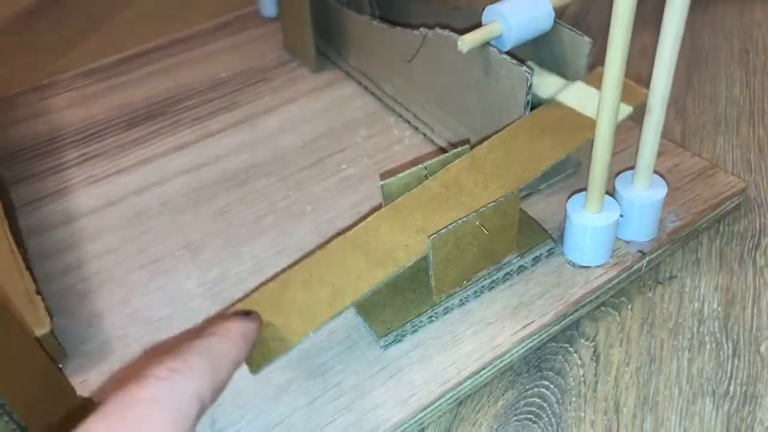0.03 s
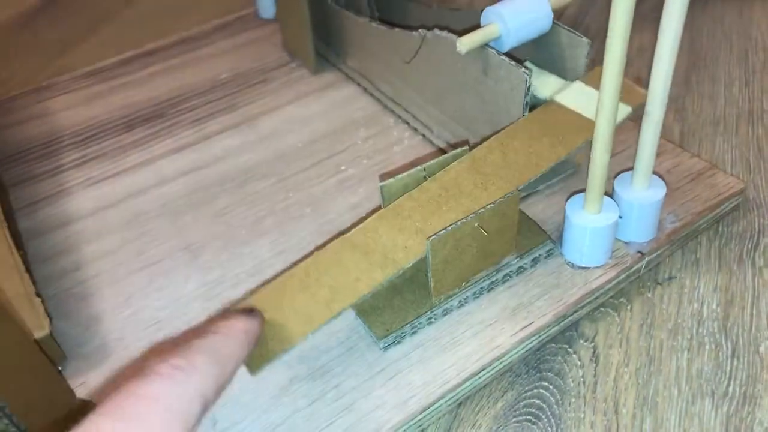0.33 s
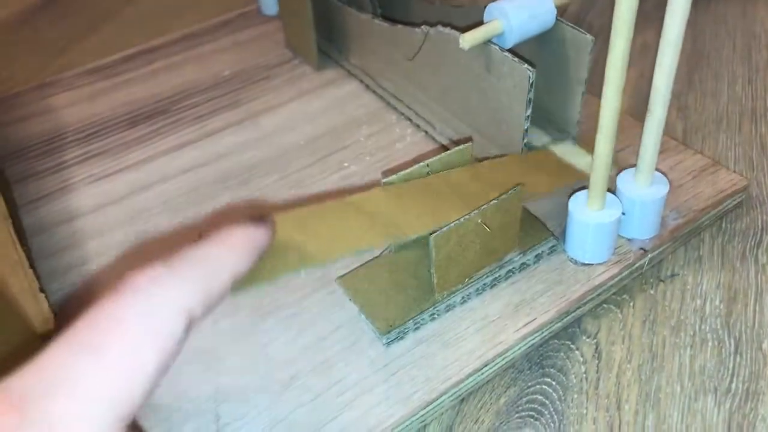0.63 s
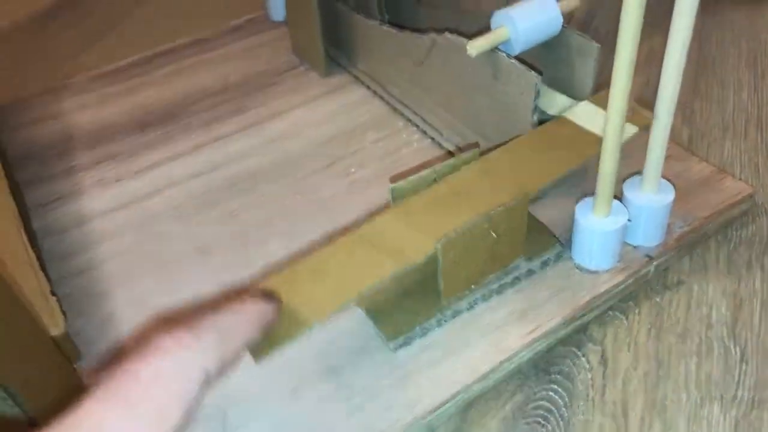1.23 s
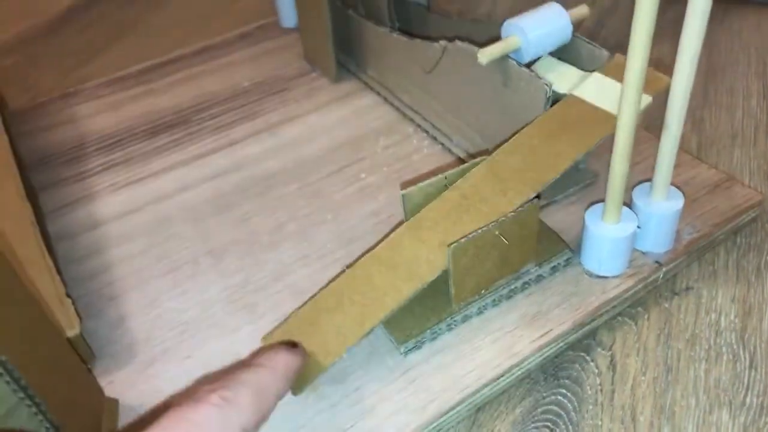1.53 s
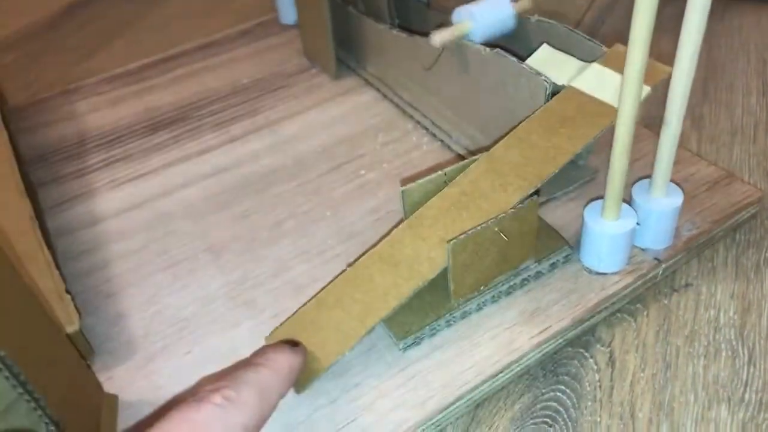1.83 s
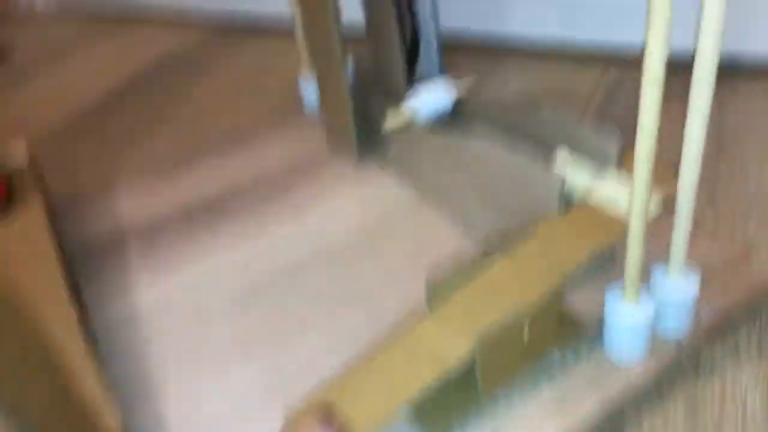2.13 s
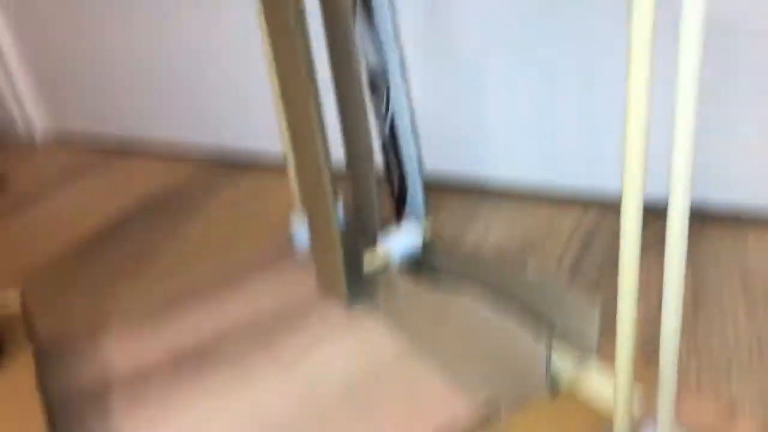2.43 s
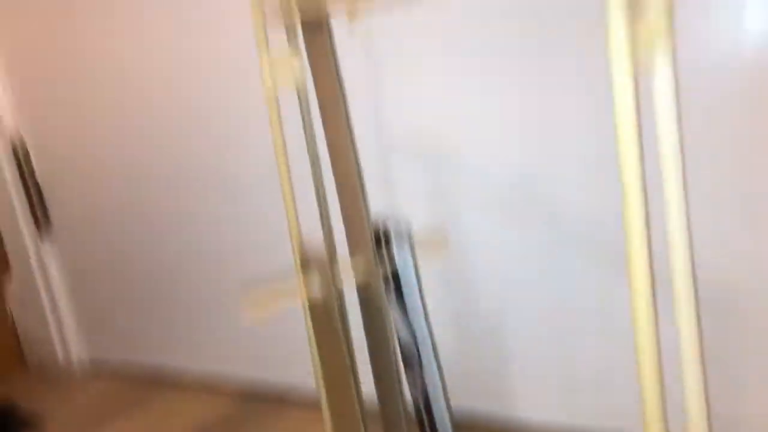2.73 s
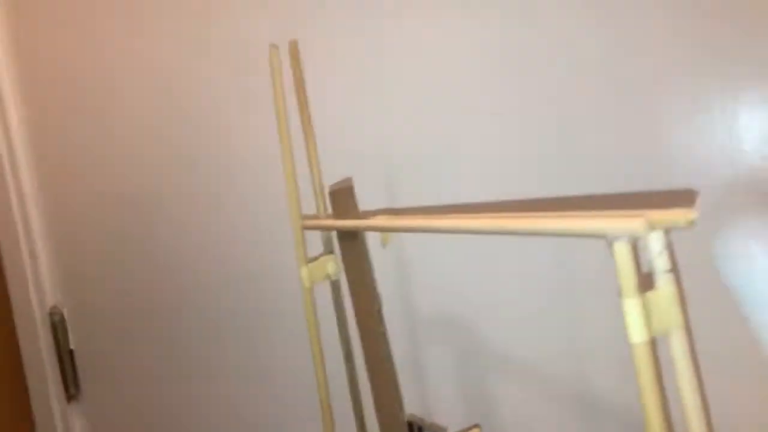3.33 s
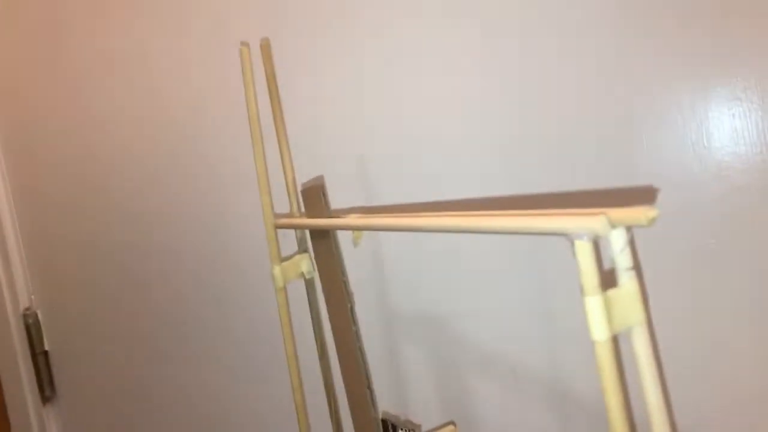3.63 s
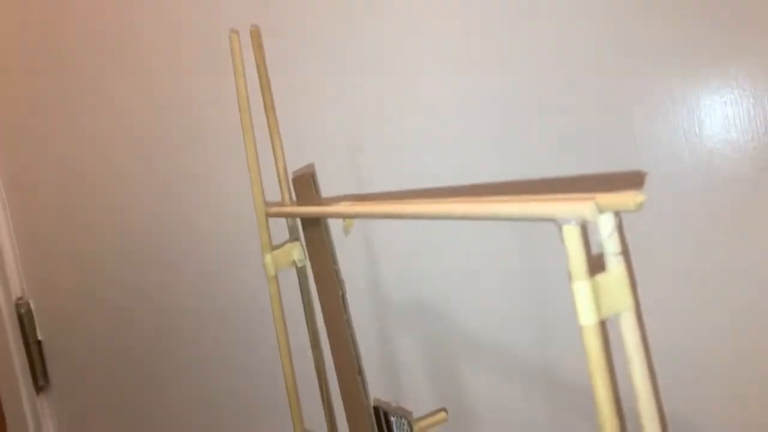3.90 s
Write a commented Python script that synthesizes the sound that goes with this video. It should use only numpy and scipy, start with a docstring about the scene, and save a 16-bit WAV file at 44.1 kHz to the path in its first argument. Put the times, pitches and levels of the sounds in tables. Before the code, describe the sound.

A light hard ball bouncing on a wooden floor is the main sound, arriving at the end. Faint cardboard ticks sound over a low room hum, with soft scrapes and swishes from about 1.5 seconds and sharper clicks near 2.1 and 2.9. The ball rumbles softly along wooden rails around 3.2, then lands with three loud, ringing cracks at 3.5, 3.7 and 3.9 seconds.

```python
"""A small, live room with a homemade wooden ball run. A cardboard lever is pressed and let go: dry ticks
ring the frame, card scrapes the base board, and lever and lift squeak and swish. A light hard ball rolls
off the top rails and bounces three times on the floor, each hit a sharp crack with ringing shell and
floorboards. The knocks drive the recorder's limiter, which ducks the low room hum."""
import sys
import numpy as np
from scipy import signal
from scipy.io import wavfile
from scipy.ndimage import uniform_filter1d

SR = 44100
rng = np.random.default_rng(int(sys.argv[2]) if len(sys.argv) > 2 else 0)


def dump_mix(stems):
    """Bounce the given channels to the path in sys.argv[1] as a 16-bit WAV at rate SR."""
    frames = np.atleast_2d(stems).T  # one column per channel
    limited = np.clip(frames, -1, 1)  # hard clip at full scale
    pcm = np.round(limited * 32767).astype(np.int16)
    wavfile.write(sys.argv[1], SR, pcm)


N = 176400

# floor hits (t/s, level/dB, crack/dB, room/dB, ring/dB, bass/dB,
# floor note at that spot f/Hz, note/dB, shell f/Hz, shell/dB)
FLOOR_HITS = [(3.486, 27.5, -1.5, 3, 4, -1, 668.5, -6.5, 2680, -6.5),
              (3.749, 26, -3, -2, -2, -3, 409.5, -12, 2370, -1.5),
              (3.8922, 22.5, -2, -9.5, -13.5, 4, 184.5, -19, 2630, -8)]
# tone of the hard contact (f/Hz, level/dB)
CRACK_EQ = [(40, -35.5), (110, -7.5), (180, -7), (300, -6.5), (700, -7.5), (950, -4.5), (1300, -4),
            (2000, -1), (2700, 1.5), (3800, -5.5), (5200, -19.5), (6800, -25.5), (8500, -35.5),
            (11000, -40), (13500, -58.5), (15500, -64.5)]
# slapback off nearby surfaces (delay/s, level/dB)
SLAPBACKS = [(.0024, -2), (.0048, -6), (.007, -7), (0.0133, -12.5), (.0175, -10.5)]
# resonances of ball and floorboards (f/Hz, level/dB, t60/s)
BALL_FLOOR_MODES = [(360.4, -5, 0.21), (420.5, -6.5, 0.19), (610, -3, 0.23), (1480, -8, 0.17),
                    (1650, -3, .17), (1722, -1.5, 0.14), (1933, -0.5, 0.21), (1987, 2, .17), (2180, 1, .18),
                    (2250, -0.5, .17), (2403, -3.5, .2), (2442, 0, .22), (2618, 2.5, 0.16),
                    (2680, -3.5, .19), (2886, -13, .17), (2995, -3.5, .18), (3300, -13.5, .17)]
# tone of the room's short answer (f/Hz, level/dB)
ROOM_EQ = [(40, -40), (110, -20.5), (170, -13.5), (280, -11), (550, -9.5), (950, -11), (1700, -5.5),
           (2800, -1.5), (3900, -9.5), (5200, -20), (6600, -22), (8500, -35.5), (11000, -43),
           (13300, -55.5), (14500, -89)]
# tone of the long, lingering tail (f/Hz, level/dB)
LATE_EQ = [(100, -11), (500, -14.5), (1400, -12.5), (2200, -6), (2900, -2.5), (3900, -11.5), (5000, -22),
           (9000, -43), (15000, -51.5)]


def bounce(db, crack_db, room_db, ring_db, bass_db, note_hz, note_db, shell_hz, shell_db):
    """The ball hits the floor: a hard crack sets shell and boards ringing, and the room answers."""
    t = np.arange(SR // 2) / SR
    ring_attack_s, shell_attack_s = 0.0091, 0.0066
    click = colour(1. * (t == 0), CRACK_EQ, bass_db)
    transient = click.copy()
    for delay, slap_db in SLAPBACKS:
        add(transient, delay, amp(slap_db) * click)
    crack = amp(-8) * transient + amp(crack_db) * colour(burst(t, t60=.03), CRACK_EQ, bass_db)
    ring = unit(ringing(t, BALL_FLOOR_MODES) * np.minimum(t / ring_attack_s, 1))
    shell = unit(mode(t, shell_hz, t60=0.021) * np.minimum(t / shell_attack_s, 1) ** 2)
    notes = amp(note_db) * mode(t, note_hz, t60=.17) + amp(shell_db) * shell
    room = amp(room_db) * colour(room_tail(t), ROOM_EQ, bass_db)
    late = amp(-21.5) * colour(burst(t, t60=1.5), LATE_EQ)
    return amp(db) * (crack + amp(ring_db - 3.5) * ring + notes + room + late)


# ticks of card and wood (t/s, level/dB, bass/dB, treble/dB, t60/s, frame ring/dB)
TICK_CUES = [(.0488, -23.5, 11, 5.5, 0.0014, -31), (.193, -31, -13, 3, 0.007, -9),
             (.852, -32, 8, -9, .01, -20), (0.8927, -25, 9.5, -9, 0.017, -16),
             (1.183, -33, 1, -12, 0.013, -22), (1.4593, -30, 4, -15, 0.0086, -16),
             (1.627, -30.5, 9, -6, .014, -20), (1.806, -31, 5, -5, 0.035, -18),
             (1.8919, -24.5, 15, -3, .02, -20), (1.927, -22, 13, -14, 0.013, -27),
             (1.97, -26, 1, -2, .015, -10), (2.0379, -16.5, 5, -23, 0.016, -20),
             (2.087, -23, 1, 3, 0.018, 3), (2.138, -10, -8, -2, 0.00094, -22),
             (2.2173, -16.5, -12, 5, 0.03, 4), (2.411, -34, 11, 0, .02, -20),
             (2.7694, -28.5, -14, -6, 0.009, 0), (2.8966, -23, -9, 8, .004, -19),
             (2.9459, -10.5, 10, 1.5, 0.0013, -33), (3.060, -29, -22, -8, 0.018, -5),
             (3.097, -30.5, -3, 3, 0.0074, -20)]
# tone of a tick (f/Hz, level/dB)
TICK_EQ = [(60, -2.5), (300, 16), (900, 9.5), (2000, 7), (3300, 4), (5000, -6), (8000, -22), (15000, -43)]
# resonances of the wooden frame (f/Hz, level/dB, t60/s)
FRAME_MODES = [(1770, -1, .035), (1900, -1, 0.027), (2330, -5, 0.032), (2575, 1, 0.027), (2730, -6, .04),
               (3980, -8, .025)]


def ticks():
    """Card and wood snap with a short crackle and ring the frame, with a touch of room."""
    t, out = np.arange(SR // 2) / SR, np.zeros(N)
    spike = 6.3 * (t == 0)
    for s, db, bass_db, treble_db, t60, ring_db in TICK_CUES:
        crackle = scatter(t) * fade(t, t60)
        snap = colour(unit(spike + crackle), TICK_EQ, bass_db, treble_db)
        add(out, s, amp(db) * (snap + amp(ring_db) * ringing(t, FRAME_MODES)))
    return out + amp(-13.5) * signal.fftconvolve(out, room_tail(t))[:N]


# soft bumps (t/s, f/Hz, level/dB, attack/s, t60/s)
BUMP_CUES = [(2.1382, 303, -16.5, 0.00063, 0.01), (2.9468, 298, -17, 0.00025, 0.02),
             (2.952, 48.6, -11, 0.0049, 0.11), (3.203, 265, -37, 0.0029, 0.15),
             (2.215, 38.4, -34.5, 0.012, 0.76), (1.965, 36, -32, .005, 0.19), (1.5, 57, -34, 0.003, 0.11)]


def bumps():
    """Dull thumps through hand and frame, each a low, damped sine."""
    t, out = np.arange(SR // 2) / SR, np.zeros(N)
    for s, hz, db, attack, t60 in BUMP_CUES:
        envelope = np.minimum(t / attack, 1) * fade(t, t60)
        add(out, s, amp(db) * envelope * np.sin(2 * np.pi * hz * t))
    return out


# fader curve of the rubbing card (t/s, level/dB)
RUB_FADER = [(1.1, -92), (1.45, -70.5), (1.785, -65.5), (1.81, -50.5), (1.87, -63.5), (1.94, -46.5),
             (2.02, -49.5), (2.11, -46), (2.17, -49), (2.21, -54), (2.28, -56.5), (2.36, -87)]
# tone of the scrape (f/Hz, level/dB)
RUB_EQ = [(60, -7), (200, 0.5), (400, -1), (650, -2.5), (1000, -7.5), (1500, -17), (2700, -19), (4500, -41),
          (7000, -26), (9000, -40), (15000, -44)]
# hollow resonances of the base board (f/Hz, level/dB, t60/s)
BOARD_MODES = [(299, -9.5, .1), (403, -1, 0.11), (549, -12.5, 0.064), (645, -7.5, 0.067), (977, -14, .04),
               (1740, -16, .05), (2694, -13, .04)]


def rubbing():
    """Cardboard scrapes over the base board and sets it ringing."""
    scrape = friction(RUB_FADER, RUB_EQ, grains_per_s=1600, spread_db=4.0)
    flat_eq = [(100, 0), (10000, 0)]
    drive = friction(RUB_FADER, flat_eq, grains_per_s=1800, spread_db=3)
    board = ringing(np.arange(SR // 4) / SR, BOARD_MODES)
    return amp(-1.0) * scrape + amp(-2.5) * signal.fftconvolve(drive, board)[:N]


# fader curve of the roll (t/s, level/dB)
ROLL_FADER = [(2.95, -75), (3.08, -58.5), (3.16, -52.5), (3.22, -48), (3.27, -55), (3.33, -75), (3.45, -76)]
# tone of the ball on the rails (f/Hz, level/dB)
ROLL_EQ = [(80, -13.5), (180, 2.5), (270, 7.5), (400, 0), (600, -6), (900, -25.5), (2000, -19.5),
           (6000, -48.5)]


def rolling():
    """The ball runs along the rails with a low, even-grained rumble."""
    return friction(ROLL_FADER, ROLL_EQ, grains_per_s=1900, spread_db=0.3)


# fader curve of the swishes (t/s, level/dB)
SLIDE_FADER = [(1.5, -73.5), (1.58, -57), (1.64, -76), (1.9, -67.5), (1.99, -55), (2.04, -70), (2.1, -54.5),
               (2.2, -77), (2.235, -50), (2.31, -65), (2.43, -68.5), (2.5, -56), (2.66, -53), (2.85, -57.5),
               (3.0, -61), (3.2, -68.5), (3.4, -74)]
# tone of the swishes (f/Hz, level/dB)
SLIDE_EQ = [(200, -4), (800, -11), (1300, -6), (2000, 0.5), (3200, -2.5), (4800, -9.5), (6000, -12),
            (8000, -24), (12000, -33), (15500, -44)]


def sliding():
    """Lever and lift slide: dense, fine slips blur into light swishes."""
    return friction(SLIDE_FADER, SLIDE_EQ, grains_per_s=16000, spread_db=1.0)


# lever squeaks (t/s, length/s, f/Hz, glide/Hz, level/dB)
SQUEAK_CUES = [(.52, 0.19, 990, 5, -75), (.70, 0.19, 1467, -17, -71.5), (.92, .12, 1437, 79, -70.5),
               (1.179, 0.263, 1900, -51, -72.5), (1.39, 0.15, 450, 3, -63.5)]


def squeaks(waver_depth=0.018):
    """The bending lever gives faint, wavering tones that swell and fade."""
    out = np.zeros(N)
    for s, length, hz, glide_hz, db in SQUEAK_CUES:
        progress = np.linspace(0, 1, round(length * SR))
        waver = np.sqrt(N) * unit(uniform_filter1d(rng.standard_normal(N), size=200))[:len(progress)]
        pitch = (hz + glide_hz * progress) * (1 + waver_depth * waver)
        swell = np.sin(np.pi * progress)
        add(out, s, amp(db) * swell * np.sin(2 * np.pi * np.cumsum(pitch) / SR))
    return out


# reverb time of the room (f/Hz, t60/s)
ROOM_DECAY = [(150, 0.22), (450, .22), (1100, 0.19), (2800, 0.21), (7000, 0.19), (13000, 0.17)]


def room_tail(t, predelay_s=0.0043, build_s=0.011):
    """Reflections build up, then die at each band's own speed."""
    hz, times, bands = signal.stft(scatter(t), SR, nperseg=256)
    decay = fade(times, read(ROOM_DECAY, hz)[:, None])
    tail = signal.istft(bands * decay, SR, nperseg=256)[1][:len(t)]
    return unit(tail * np.clip((t - predelay_s) / build_s, 0, 1))


# tone of the room's rumble and hiss (f/Hz, level/dB)
AIR_EQ = [(10, -15), (25, 0), (45, 3), (70, -6), (130, -22), (250, -26.5), (500, -38.5), (1000, -38),
          (3000, -42), (6000, -47.5), (9000, -51), (13000, -57), (16000, -60.5)]


def room_tone(hum_hz=100.9):
    """A bed of low rumble, faint hiss and mains hum."""
    air = np.sqrt(N) * unit(colour(rng.standard_normal(N), AIR_EQ, size=16384))
    hum = np.sin(2 * np.pi * hum_hz * np.arange(N) / SR)
    return amp(-47) * air + amp(-48) * hum


def friction(fader, eq, grains_per_s, spread_db):
    """Tiny slips of uneven size excite a surface under a fader curve."""
    sizes = rng.standard_normal(N) * amp(spread_db * np.minimum(rng.exponential(1, N), 4))
    slips = sizes * (rng.random(N) < grains_per_s / SR)
    s, db = np.transpose(fader)
    envelope = amp(np.interp(np.arange(N) / SR, s, db, left=-110, right=-110))
    return np.sqrt(N) * unit(colour(slips, eq)) * envelope


def colour(x, eq, bass_db=0, treble_db=0, size=4096):
    """Minimum-phase EQ with two shelves; its energy is 1, so the curve's levels are relative."""
    hz = abs(np.fft.fftfreq(size, 1 / SR))
    bass = bass_db / (1 + (hz / 750) ** 4)
    treble = treble_db * (1 - 1 / (1 + (hz / 3300) ** 4))
    log_gain = np.log(amp(read(eq, hz) + bass + treble))
    response = np.exp(np.conj(signal.hilbert(log_gain)))
    taps = np.fft.ifft(response).real[:size // 2]
    return signal.fftconvolve(x, unit(taps))[:len(x)]


def ringing(t, modes):
    """Dying partials of alternating sign, total energy 1."""
    return unit(sum((-1) ** k * amp(db) * mode(t, hz, t60) for k, (hz, db, t60) in enumerate(modes)))


def mode(t, hz, t60):
    """One dying partial of energy 1."""
    return unit(np.sin(2 * np.pi * hz * t) * fade(t, t60))


def burst(t, t60):
    """Dying noise of energy 1."""
    return unit(scatter(t) * fade(t, t60))


def scatter(t):
    """White noise of random signs."""
    return rng.choice([-1., 1.], len(t))


def fade(t, t60):
    """Falls 60 dB in t60 seconds."""
    return np.exp(-np.log(1000) * t / t60)


def amp(db):
    """Decibels to gain."""
    return 10 ** (np.asarray(db) / 20)


def unit(x):
    """Scales to energy 1."""
    return x / np.sqrt(np.sum(x ** 2) + 1e-20)


def read(points, hz):
    """Reads a curve on a log-frequency axis."""
    f, value = np.transpose(points)
    return np.interp(np.log(hz + 1), np.log(f + 1), value)


def add(mix, s, sound):
    """Mixes a sound in at s seconds."""
    part = mix[round(s * SR):][:len(sound)]
    part += sound[:len(part)]


def scene():
    """Mono mix of lever, lift, roll and bounces over the room tone."""
    out = room_tone() + ticks() + bumps() + rubbing() + squeaks() + sliding() + rolling()
    for s, *hit in FLOOR_HITS:
        add(out, s, bounce(*hit))
    return out[None]


def record(dry, threshold_db=-8.5, release_db_per_s=11, ceiling=0.9, cut_s=3.935, lowpass_hz=15800):
    """A fast limiter with slow release, soft clipping, a hard cut to silence and a low-pass."""
    t = np.arange(N) / SR
    power_db = 10 * np.log10(abs(uniform_filter1d(dry[0] ** 2, size=220)) + 1e-12)
    release_db = t * release_db_per_s
    held_db = np.maximum.accumulate(power_db + release_db) - release_db
    reduction_db = np.maximum(held_db - threshold_db, 0)
    ducked = dry / amp(uniform_filter1d(reduction_db, size=60))
    clipped = ducked / (1 + (ducked / ceiling) ** 6) ** (1 / 6)
    lowpass = signal.firwin(511, lowpass_hz, window=("kaiser", 9), fs=SR)
    return signal.oaconvolve(clipped * (t < cut_s), lowpass[None], "same")


dry = scene()
out = record(dry)
dump_mix(out)
```